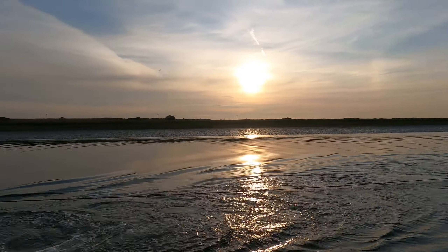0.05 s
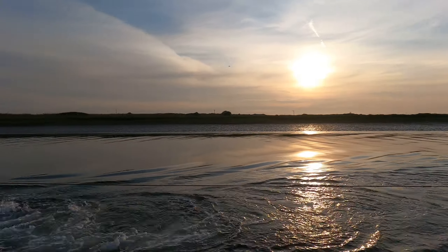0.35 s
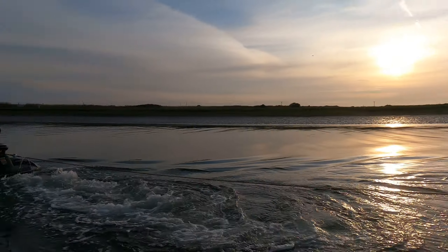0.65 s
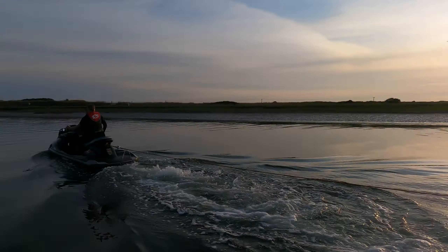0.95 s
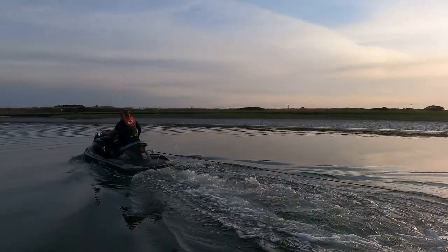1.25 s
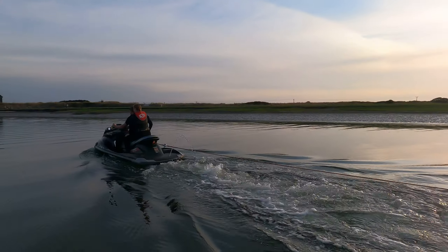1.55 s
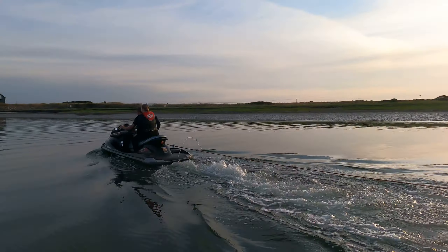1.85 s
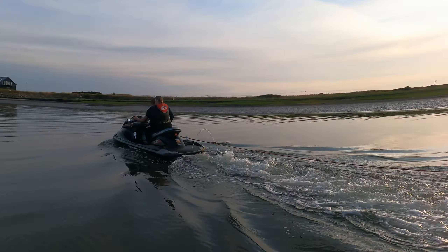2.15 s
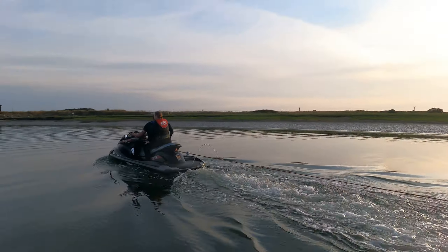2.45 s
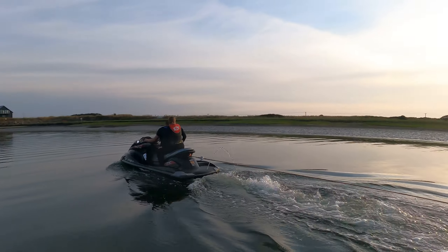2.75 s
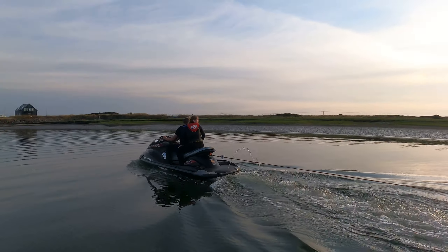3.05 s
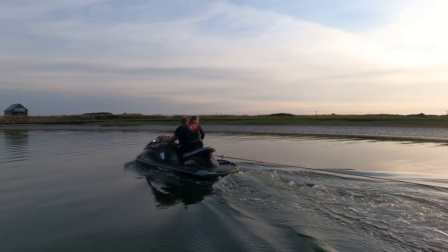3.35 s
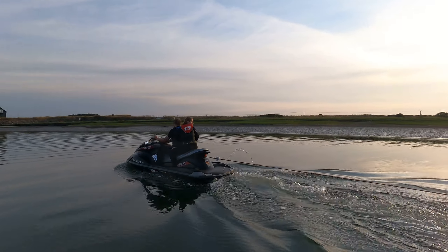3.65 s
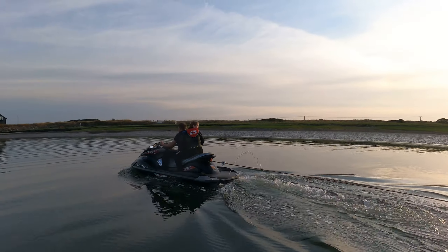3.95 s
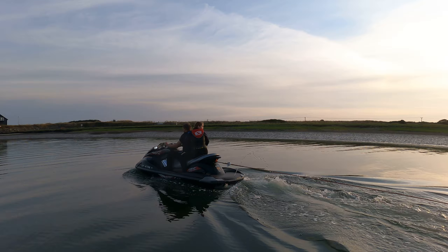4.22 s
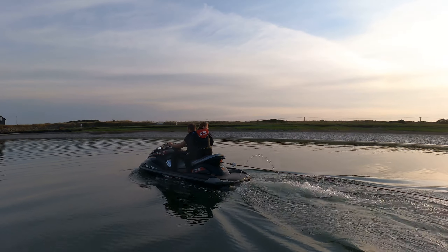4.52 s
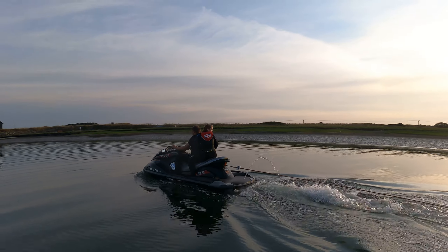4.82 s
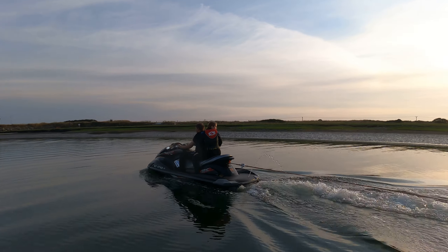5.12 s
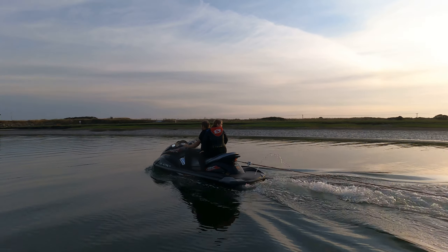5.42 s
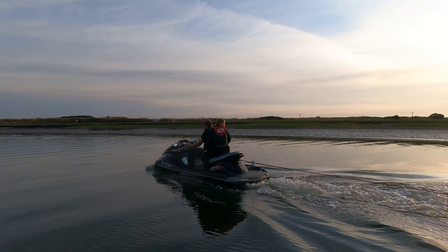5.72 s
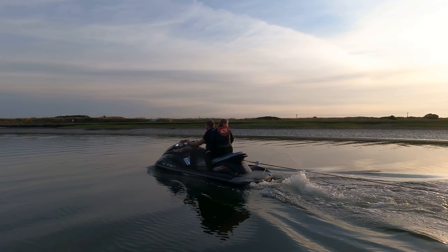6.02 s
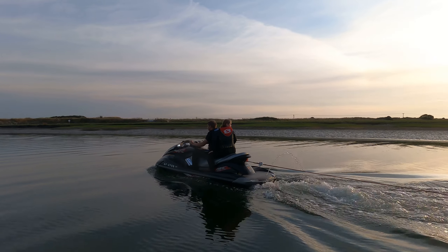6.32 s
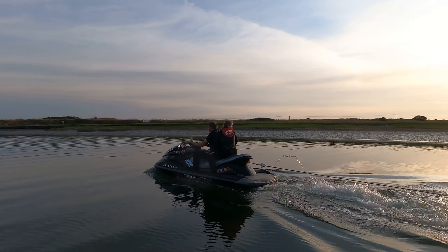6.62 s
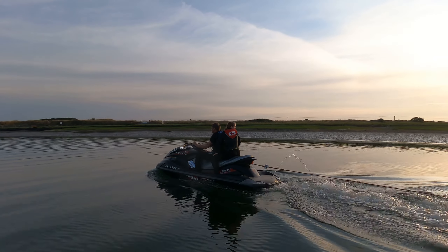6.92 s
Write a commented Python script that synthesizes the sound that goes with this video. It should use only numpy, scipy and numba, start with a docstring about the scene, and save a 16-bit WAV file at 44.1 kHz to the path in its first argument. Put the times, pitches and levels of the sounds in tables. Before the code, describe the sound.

A jet ski hums along near idle with a fizzing wake, while fingers rub and knock the microphone in the first seconds.

```python
"""Water scooter towing on calm water

A hand-held camera follows the craft at little more than idle. The engine's low note beats with a second
drone, loose machinery rings the hull, exhaust gas burbles through the water and bubbles fizz in the wake.
Drops fall and air buffets the microphone. For three seconds fingers rub and knock the camera housing;
its gain control ducks and slowly recovers."""
import sys
import numpy as np
from scipy import signal
from scipy.fft import rfft, irfft, next_fast_len
from scipy.io import wavfile
from scipy.ndimage import uniform_filter1d, minimum_filter1d, map_coordinates
from numba import njit

SR = 44100
rng = np.random.default_rng(int(sys.argv[2]) if len(sys.argv) > 2 else 0)


def store_pcm(level_fs):
    """Save levels as 16-bit WAV."""
    pcm = np.round(np.clip(level_fs, -1, 1) * 32767).astype(np.int16)
    wavfile.write(sys.argv[1], SR, np.atleast_2d(pcm).T)


N = 311787
T = np.arange(N) / SR
SIZE = next_fast_len(N + SR // 2, True)
FREQS = np.maximum(np.fft.rfftfreq(SIZE, 1 / SR), 1)

# The exhaust swells as the stern turns to the camera. Each row: time in seconds, gain in dB.
EXHAUST_SWELL = [(0, 1.5), (1.6, -1.5), (3.3, -1.5), (4.3, 0.2), (5.6, 0.5), (6.6, 1), (7.07, 1.5)]
# The machinery swells as the craft comes round in front. Each row: time in seconds, gain in dB.
MACHINERY_SWELL = [(0, 2), (.6, -1.5), (1.6, -1), (4.2, 0.5), (5.1, 2), (7.07, 2.5)]
# Transmission through the housing's thin wall. Each row: frequency in Hz, relative gain in dB.
WALL_SPECTRUM = [(250, -4.5), (600, 4), (850, 0), (1020, 13.5), (1400, 9), (1820, 16.5), (2060, -3.5),
                 (2300, 0), (2700, 6), (3050, 1), (3750, -9), (4150, -13.5), (4450, -7.5), (5350, -22.5),
                 (5800, -16), (6450, -44), (7300, -22.5), (8000, -28.5), (8600, -52.5), (10300, -51),
                 (14000, -60)]


def undb(db):
    """Amplitude ratio of a level in decibels."""
    return 10 ** (np.asarray(db) / 20)


def unit(x):
    """Normalisation to an rms of 1."""
    return x / np.sqrt(np.mean(x ** 2))


def curve(rows):
    """Linear interpolation of (time, value) rows."""
    return np.interp(T, *np.array(rows).T)


def over_hz(rows, column=1):
    """Interpolation of one column on a log-frequency axis."""
    rows = np.array(rows)
    return np.interp(np.log(FREQS), np.log(rows[:, 0]), rows[:, column])


def filtered(x, response):
    """Linear filtering: the spectrum is multiplied by a frequency response."""
    return irfft(rfft(x, SIZE) * response, SIZE)[..., :N]


def above(x, hz):
    """Steep high-pass filtering."""
    return filtered(x, 1 / (1 + (hz / FREQS) ** 8))


def resonance(hz, width_hz):
    """Response of a damped oscillator, gain 1 at its centre."""
    return 1 / (1 + 1j * (FREQS ** 2 - hz ** 2) / (FREQS * width_hz))


def walk(rate):
    """Smoothed random fluctuation with rate new values a second; rms 1."""
    hold = int(SR / rate)
    steps = np.repeat(rng.standard_normal(N // hold + 1), hold)
    return unit(uniform_filter1d(uniform_filter1d(steps, hold), hold)[:N])


def grains(rate, spread_db):
    """Shot noise: rate clicks a second, a few much larger than the rest."""
    size = undb(spread_db * np.minimum(rng.exponential(size=N), 5))
    return unit((rng.random(N) < rate / SR) * size * rng.choice([-1, 1], N))


def flurry(rate, spread_db, decay_s):
    """Envelope of random bursts that each decay exponentially; rms 1."""
    return unit(signal.lfilter([1], [1, -np.exp(-1 / (decay_s * SR))], np.abs(grains(rate, spread_db))))


def dying(start, decay_s):
    """Free decay: a sudden start and an exponential fall."""
    return (T >= start) * np.exp(-np.abs(T - start) / decay_s)


def stroke(start, length, edge=0.26):
    """Trapezoidal envelope of a contact that grows, holds and lets go."""
    progress = np.clip((T - start) / length, 0, 1)
    return np.minimum(np.minimum(progress, 1 - progress) / edge, 1)


def burst(x, length, db):
    """Scaling to the energy of a level db held for length seconds."""
    return unit(x) * undb(db) * np.sqrt(length * SR / N)


def struck(blows, gain):
    """Causality: a minimum-phase body rings only after each blow (time in seconds, peak in dB)."""
    cepstrum = irfft(np.log(gain + 1e-6 * gain.max()), SIZE)
    response = np.exp(rfft(2 * cepstrum * (np.arange(SIZE) < SIZE // 2)))
    force = np.zeros(N)
    for start, db in blows:
        force[int(start * SR)] += undb(db)
    return filtered(force, response / np.abs(irfft(response, SIZE)).max())


def harmonics(turns, orders, waver_db):
    """Periodic motion sounds at multiples of its rate; each wavers in level."""
    return sum(undb(db + waver_db * walk(6.5)) * np.sqrt(2) * np.sin(2 * np.pi * (k * turns + rng.random()))
               for k, db in orders)


def hum(turns, drone_hz=68.1):
    """Beating: the shaft's second harmonic interferes with a slightly lower drone."""
    # Each row of both: multiple of the source's rate, level in dB before the swell.
    engine_orders = [(2, -41), (3, -48), (4, -51), (6, -56.5), (8, -50.5), (11, -58)]
    drone_orders = [(1, -45), (3, -55.5)]
    drone_turns = np.cumsum(drone_hz * (1 + 0.0052 * walk(3.3))) / SR
    engine = harmonics(turns, engine_orders, waver_db=2.16)
    drone = harmonics(drone_turns, drone_orders, waver_db=2.1)
    return (engine + drone) * undb(curve(EXHAUST_SWELL))


def hull():
    """Gain of engine and hull, whose modes add in power."""
    # Each row: frequency in Hz, nominal width in Hz, gain in dB.
    modes = [(932, 67, -7.5), (1236.6, 111, 6), (1498, 68, -7), (1600, 47, -4.5), (1826, 44, -12.5),
             (1982, 80, -11), (2304, 380, -18), (2706, 150, -17), (2905, 110, -14.5), (4380, 130, -24.5),
             (5200, 200, -25.5)]
    return np.sqrt(sum(np.abs(undb(db) * resonance(hz, 1.06 * width) ** 2) ** 2 for hz, width, db in modes))


def clatter(turns, level_db=-42.5, firing_share=0.06, steady=4.2):
    """Forced vibration: a dense rattle drives the hull, a little harder at each firing, two a turn."""
    firing = 1 + firing_share * np.cos(4 * np.pi * turns)
    rattle = (steady + flurry(rate=500, spread_db=1.5, decay_s=0.0022)) * firing
    force = unit(rattle) * undb(level_db + curve(MACHINERY_SWELL))
    return filtered(force * rng.standard_normal((2, N)), unit(hull()))


def light_metal():
    """Gain of the light metal parts, which resonate in one bright band."""
    return np.abs(resonance(2801, 415)) ** 3


def chatter(level_db=-55.5, steady=1.6):
    """Random excitation in short clusters makes the light metal buzz."""
    force = unit(steady + flurry(rate=90, spread_db=0.1, decay_s=0.0065))
    buzz = unit(filtered(force * rng.standard_normal((2, N)), light_metal()))
    return buzz * undb(level_db + curve(MACHINERY_SWELL))


def burble(turns, level_db=-42, throb=0.34, gulp_db=2.0):
    """Modulated flow noise: the firings push exhaust gas through the water in gulps."""
    # Each row: frequency in Hz, relative spectral density in dB.
    spectrum = [(45, -18.5), (85, -7), (125, 1.5), (175, -3), (210, 4), (260, -6.5), (340, -11),
                (600, -12.5), (760, -22), (1100, -10.5), (2000, -68.5)]
    flow = (1 + throb * np.cos(4 * np.pi * turns)) * undb(gulp_db * walk(25))
    gas = filtered(flow * rng.standard_normal((2, N)), undb(over_hz(spectrum)))
    return unit(gas) * undb(level_db + curve(EXHAUST_SWELL))


def wake(level_db=-49, flutter_db=1.3, rush=0.82):
    """Tiny bursting bubbles add shot noise to the rush of churned water."""
    # Each row: frequency in Hz, relative spectral density in dB.
    spectrum = [(200, -7), (500, 8), (1000, 12.5), (1700, 18), (2100, 9), (2750, 9.5), (3100, -3.5),
                (3500, 2), (4500, 1.5), (4900, -11), (5600, -1.5), (5950, -12.5), (7400, -14),
                (9300, -23.5), (11000, -47), (14000, -63)]
    # The hiss fades over the first seconds, then swells back near five seconds.
    # Each row: time in seconds, gain in dB.
    swell = [(0, 4), (2.6, -0.5), (3.8, 0.7), (4.8, 4), (7.07, 1)]
    foam = np.zeros((2, N))
    for channel in foam:
        channel += grains(rate=2500, spread_db=2.0) + rush * rng.standard_normal(N)
        channel *= undb(flutter_db * walk(18))
    return unit(filtered(foam, undb(over_hz(spectrum)))) * undb(level_db + curve(swell))


def churn(patter=0.24, surge_db=-0.5):
    """Close water folds over in splashes, each a puff of shot noise from bursting bubbles."""
    # Each row: frequency in Hz, relative spectral density in dB.
    spectrum = [(400, -19.5), (900, 10.5), (1600, 10), (2150, -4), (2700, 0.5), (3350, 2.5), (4000, -9.5),
                (4600, -3.5), (5400, -11), (7000, -16.5), (9000, -26.5), (11000, -40), (14000, -46)]
    # Loudest as the camera swings past the wake. Each row: time in seconds, level in dB.
    levels = [(0, -41), (.65, -41.5), (1, -45), (2.5, -45.5), (3.5, -59), (4.7, -50.5), (5.8, -51.5),
              (7.07, -45.5)]
    splashes = patter * flurry(rate=110, spread_db=2.0, decay_s=0.0069) + undb(surge_db * walk(8.4)) / 2
    bubbles = np.array([grains(rate=6000, spread_db=2.5) for _ in range(2)])
    return unit(filtered(splashes * bubbles, undb(over_hz(spectrum)))) * undb(curve(levels))


def breeze(gust_db=1.5, side_db=-26):
    """Turbulent pressure: slow eddies press on both microphone ports almost alike."""
    # Each row: frequency in Hz, relative spectral density in dB.
    spectrum = [(4, -28.5), (11, 7), (26, 7.5), (45, -1), (90, -13.5), (200, -30), (600, -88.5)]
    # Strongest as the camera swings round. Each row: time in seconds, level in dB.
    levels = [(0, -49), (.35, -30.5), (1.4, -33), (2, -27.5), (2.65, -27), (3.4, -43), (7.07, -43)]
    mid, side = unit(filtered(rng.standard_normal((2, N)), undb(over_hz(spectrum))))
    strength = undb(curve(levels) + gust_db * walk(5.2))
    # stronger air breaks into smaller eddies, which differ between the ports
    side = side * undb(side_db) * strength / strength.max()
    return np.array([mid + side, mid - side]) * strength


def droplets(per_s=6.5, level_db=-43.5, centre_hz=4020, db_per_octave=-10, attack_s=.0003, decay_s=0.0017):
    """Stray droplets ping as damped sinusoids at random times, pitches and sides."""
    out, size = np.zeros((2, N)), 1024
    t = np.arange(size) / SR
    for when, pitch, strength, pan in rng.random((int(per_s * N / SR), 4)):
        start, octave = int(when * (N - size)), .9 * (2 * pitch - 1)
        envelope = (1 - np.exp(-t / attack_s)) * np.exp(-t / decay_s)
        ping = envelope * np.sin(2 * np.pi * centre_hz * 2 ** octave * t)
        gain = undb(level_db + db_per_octave * octave + 3 * (2 * strength - 0.5))
        out[:, start:start + size] += np.sqrt([[2 * pan], [2 - 2 * pan]]) * ping * gain
    return out


def ticks():
    """The clearest drops and slaps are transients: decaying noise in one band."""
    # Each row: start in seconds, peak in dB, centre in Hz, nominal width as a share of the centre,
    # decay in seconds, left minus right in dB.
    drops = [(0.086, -19.5, 2700, 0.67, 0.0012, 0), (0.1831, -30, 1990, .6, 0.0034, -5),
             (0.2996, -31.5, 3040, 0.42, 0.0039, -1.5), (0.59, -30, 2870, 0.44, 0.0069, 4),
             (0.611, -31, 2840, .45, 0.0022, -2), (0.6246, -48, 9500, .5, 0.0011, 16),
             (0.8265, -33, 2800, 0.64, 0.0021, -1), (1.023, -47, 6000, 0.76, 0.0011, 3),
             (1.298, -44, 4200, .8, 0.014, 5), (1.647, -34, 5200, 0.35, 0.0022, 4),
             (3.982, -59, 8200, 0.49, .0015, 3), (4.013, -37.5, 3850, 0.66, 0.0079, -2),
             (4.512, -33, 1960, 0.45, 0.0065, 0), (5.939, -60, 9200, 0.42, 0.0016, 10),
             (6.232, -57, 7950, .53, .0015, 11)]
    out = np.zeros((2, N))
    for start, db, hz, width, decay_s, pan_db in drops:
        tick = filtered(rng.standard_normal(N) * dying(start, decay_s), resonance(hz, width * hz) ** 3)
        out += undb(db + np.array([[pan_db], [-pan_db]]) / 2) * tick / np.abs(tick).max()
    return out


def housing():
    """Response of the camera housing, a superposition of damped modes."""
    # Each row: frequency in Hz, width in Hz, gain in dB before the broad band-pass.
    modes = [(259, 70, 0.5), (371, 160, -10), (511.6, 42, 2.5), (635, 93, 3.5), (855, 33, 0.5),
             (1040, 49, -4.5)]
    return sum(undb(db) * resonance(hz, width) for hz, width, db in modes) * resonance(382, 690) ** 2


def rasp():
    """Fine friction grains, filtered by the housing's thin wall."""
    return unit(filtered(grains(rate=5800, spread_db=3.0), undb(over_hz(WALL_SPECTRUM))))


def pressed(x, bend=.03, catch_db=1.85):
    """Shifting finger pressure modulates a rub in frequency and amplitude."""
    place = np.cumsum(1 + bend * walk(30))
    return map_coordinates(x, [place], order=3, mode="mirror") * undb(catch_db * walk(90))


def rubs(boom, body, boom_db=4.5, rasp_db=-6.5, crisp_hz=2290):
    """Sliding friction: a dry fingertip rasps, a soft pad makes the mount boom."""
    # Each row: start and length in seconds, then housing level, dryness and crispness in dB.
    slides = [(0.311, 0.15, -39.5, 9, 2), (0.574, 0.085, -39.5, 4.5, -0.5), (0.666, 0.059, -32.5, 6, -21),
              (0.892, 0.062, -36, -0.5, -18), (0.948, 0.044, -35.5, 10, -2), (0.973, 0.07, -29.5, -0.5, 1),
              (1.02, 0.055, -32.5, 5, -5.5), (1.05, 0.12, -46.5, 5, -3), (1.699, 0.058, -28, 5, 0),
              (1.741, 0.077, -35.5, 0.5, 0.5), (1.896, 0.105, -36, -3.5, 13), (1.985, 0.078, -37.5, 4.5, 4),
              (2.116, 0.067, -40, -3, 6), (2.166, 0.046, -35, -9, 2.5), (2.206, 0.055, -30, 2, -1.5),
              (2.355, 0.049, -27, -3.5, 4), (2.377, 0.094, -25, 1.5, 8), (2.469, 0.032, -33, -15, 5),
              (2.496, 0.14, -47, 2.5, 4)]
    shifting_grip = (0, 2.84, -52, 0.014, 0.0015)
    scrape = pressed(rasp())
    treble = above(scrape, crisp_hz)
    out = np.zeros(N)
    for start, length, db, dry_db, crisp_db in [shifting_grip] + slides:
        touch = stroke(start, length)
        crisp_scrape = scrape + (undb(crisp_db) - 1) * treble
        out += burst(touch * boom, length, db + boom_db - dry_db)
        out += burst(touch * body, length, db)
        out += burst(touch * crisp_scrape, length, db + rasp_db + dry_db)
    return out


def creaks(body, mount_hz, jitter=0.0364, drag_db=3, drag_share=0.92):
    """Stick-slip friction: a train of slips drives mount and housing while the fingertip drags."""
    # Each row: start and length in seconds, first, middle and last slip rate in Hz,
    # mount and housing levels in dB, low-pass corner in Hz.
    grips = [(0.928, 0.07, 131.6, 130.2, 125, -34.5, -28.5, 168.6),
             (2.269, 0.0886, 146.3, 173.7, 157, -10.5, -17, 796),
             (2.396, 0.064, 143, 139.2, 138, -22.5, -17.5, 261)]
    out = np.zeros(N)
    for start, length, first_hz, middle_hz, last_hz, boom_db, body_db, corner_hz in grips:
        rate = np.interp(T, [start, start + length / 2, start + length], [first_hz, middle_hz, last_hz])
        rate *= 1 + jitter * walk(200)
        slips = np.diff(np.floor(np.cumsum(rate) / SR), prepend=0) * stroke(start, length, edge=0.11)
        low_pass = 1 / (1 + 1j * FREQS / corner_hz) ** 2
        out += burst(filtered(slips, resonance(mount_hz, 70) ** 2), length, boom_db)
        out += burst(filtered(slips * undb(5.0 * walk(150)), housing() * low_pass), length, body_db)
        drag = burst(stroke(start, drag_share * length) * body, length, body_db + drag_db)
        out += filtered(drag, np.sqrt(low_pass))
    return out


def handling(mount_hz=133):
    """Friction rings the housing and rocks it on its hand-damped mount, in rubs and creaks."""
    friction = grains(rate=1800, spread_db=1)
    boom = filtered(friction, resonance(mount_hz, 28) * resonance(mount_hz, 66))
    body = pressed(filtered(friction, housing()))
    return rubs(boom, body) + creaks(body, mount_hz)


def knocks(ring_hz=142, thud_hz=58, thud_s=0.0082, contact_s=0.005, scrape_s=0.029):
    """Impact and free decay: a click and a thud, then mount and housing ring as the grip scrapes."""
    # The mount rings longer with the hand off it. Each row: start in seconds, ring in dB, its decay in
    # seconds, thud in dB, housing in dB, its decay in seconds, scrape in dB, click in dB.
    blows = [(0.359, -18.5, 0.058, -23, -38, 0.027, -54, -39),
             (0.683, -37, 0.01, -24, -30.5, 0.034, -43, -19.5),
             (0.919, -24, 0.0069, -10.5, -36, .01, -45, -34),
             (0.939, -22.5, 0.011, -21, -18, 0.016, -31, -20),
             (0.994, -13, 0.018, -9, -35, 0.0091, -38.5, -20),
             (1.811, -14.5, 0.053, 2, -24, .02, -31.5, -21), (2.234, -37, 0.013, -2.5, -32, .02, -42, -22),
             (2.253, -2.5, 0.012, -21.5, -15, 0.015, -28.5, -12.5),
             (2.482, -1, 0.018, -1.5, -5.5, 0.0075, -36, -21.5),
             (2.512, -11.5, 0.011, 2, -32, 0.024, -37.5, -30.5),
             (2.634, -15, 0.025, -15, -33, 0.023, -36.5, -28.5),
             (2.666, 1, 0.048, 5.5, -15.5, 0.031, -16, -11)]
    out, scrape = np.zeros(N), rasp()
    body = unit(filtered(rng.standard_normal(N), housing()))
    for start, ring_db, ring_s, thud_db, body_db, body_s, scrape_db, _ in blows:
        ring = undb(ring_db) * dying(start, ring_s) * np.sin(2 * np.pi * ring_hz * (T - start))
        thud = undb(thud_db) * dying(start, thud_s) * np.sin(2 * np.pi * thud_hz * (T - start))
        shell = undb(body_db) * dying(start, body_s) * body
        grip = undb(scrape_db) * dying(start, scrape_s) * scrape
        out += (1 - dying(start, contact_s)) * (ring + thud + shell + grip)
    clicks = [(start, click_db) for start, *_, click_db in blows]
    return out + struck(clicks, undb(over_hz(WALL_SPECTRUM)))


def scratches(lowest_hz=4970):
    """A skidding fingernail excites only the highest modes of the wall."""
    # Each row: start in seconds, length in seconds, level in dB.
    skids = [(2.246, 0.026, -56), (2.402, 0.053, -56), (2.662, 0.012, -46.5), (2.678, 0.028, -43.5)]
    thin = above(rasp(), lowest_hz)
    return sum(burst(stroke(start, length) * thin, length, db) for start, length, db in skids)


def clanks(rebound_s=0.0042, rebound_db=-8.5):
    """Inelastic impact: a loose part rings hull and light metal, then lands again more weakly."""
    # Each row: start in seconds, peak of the hull in dB, peak of the light metal in dB.
    blows = [(3.358, -44, -37.5), (3.646, -45, -46), (3.8935, -36, -41), (4.0112, -29, -47),
             (4.2644, -32, -43), (4.361, -37, -35), (4.511, -26.5, -33), (4.679, -30, -44),
             (5.0188, -36, -37), (5.112, -28, -35), (5.1994, -28.5, -44), (5.648, -43, -40),
             (6.058, -25.5, -42), (6.157, -27.5, -44), (6.232, -42, -35), (6.5495, -43, -38),
             (6.715, -26.5, -42), (6.915, -33, -40)]
    starts, hull_db, metal_db = np.array(blows).T
    rebounds = starts + rebound_s * (.5 + rng.random(len(starts)))
    times = np.r_[starts, rebounds]
    return sum(struck(zip(times, np.r_[db, db + rebound_db]), gain)
               for db, gain in [(hull_db, hull()), (metal_db, light_metal())])


def outdoors(pair, field):
    """Partial coherence: two unrelated versions of a sound become mid and side."""
    mid, side = pair[0], filtered(pair[1], undb(over_hz(field)))
    lean = undb(over_hz(field, column=2) / 2)
    return filtered(np.array([mid + side, mid - side]), np.array([lean, 1 / lean]) * 2 / (lean + 1 / lean))


def through_housing(x):
    """Structure-borne sound reaches each port with its own phase and strength."""
    # Each row: frequency in Hz, phase lead of the left in radians, left minus right in dB.
    ports = [(80, 0.1, 0.3), (170, 0.11, 0), (254, 0.85, -4.5), (400, 1.36, 0.5), (547, 1.13, -3),
             (780, 2, -10), (930, 2, -10), (890, 0.83, 2), (1280, 1.65, 2), (1880, 0.3, 2.5),
             (2380, 2, -0.5), (2660, 0.6, 13.5), (5100, -1.5, -3.5), (7000, 13, 3), (11000, -3, 22)]
    lean = undb(over_hz(ports, column=2) / 2)
    left = lean * np.exp(.5j * over_hz(ports))
    return filtered(x, np.array([left, 1 / left]) * 2 / (lean + 1 / lean))


def narrowed(pair):
    """The stereo image closes and reopens as the side signal fades and returns."""
    # Each row: time in seconds, side gain in dB.
    width = [(0, -1.5), (2.75, -1), (3.1, -9), (3.3, -16), (3.55, -32), (3.95, -50), (4.3, -15.5),
             (4.55, -10), (5.1, -4), (5.6, -1.5), (7.07, -1)]
    mid = (pair[0] + pair[1]) / 2
    side = (pair[0] - pair[1]) / 2 * undb(curve(width))
    return np.array([mid + side, mid - side])


def scene(shaft_hz=36.64, wander=0.00698, jitter_turns=.012):
    """Superposition of craft and water around the camera, handling and breeze right on it."""
    # Stereo spread. Each row of both: frequency in Hz, side minus mid in dB, left minus right in dB.
    craft_field = [(120, -56, 0), (300, -31, 0.4), (650, -8, 5), (900, -41.5, 1), (1250, -33.5, 3),
                   (1750, -38, 2), (2200, -22, 1), (2800, -29, 4.5), (3200, -29, 5), (5000, -31.5, -0.5),
                   (9100, -10.5, 1), (12300, 4, 18.5)]
    water_field = [(300, -14, -8), (655, 9.5, -8), (950, -12.5, 4), (1500, -11.5, 17), (2040, 11, -3),
                   (2870, 7, 1.5), (3400, -2, -1.5), (5000, -0.5, -5), (9000, -6, 13), (12000, -5, 9.5)]
    turns = np.cumsum(shaft_hz * (1 + wander * walk(5))) / SR
    turns += jitter_turns * walk(25)  # uneven firings push the shaft ahead and behind
    tones = hum(turns)
    craft = outdoors(clatter(turns) + chatter() + burble(turns) + wake(), craft_field) + clanks()
    water = outdoors(churn(), water_field) + ticks()
    fingers = through_housing(handling() + knocks() + scratches())
    return narrowed(tones + craft + water + fingers + breeze() + droplets())


@njit
def peak_follower(x, hold, fall):
    """Peak detection: jumps to each peak, holds it, then sinks exponentially."""
    out, peak, age = np.empty(len(x)), 0., 0.
    for i in range(len(x)):
        age += 1
        if x[i] > peak:
            peak, age = x[i], 0.
        elif age > hold:
            peak *= fall
        out[i] = peak
    return out


def record(dry, ceiling_db=-5.0, hold_s=0.37, recover_db_per_s=14.0, top_hz=13500):
    """Automatic gain control ducks at once under a peak and recovers slowly; a low-pass cuts the top."""
    peak = peak_follower(np.abs(dry.mean(axis=0)), float(hold_s * SR), float(undb(-recover_db_per_s / SR)))
    gain = np.minimum(undb(ceiling_db) / (peak + 1e-9), 1)
    gain = uniform_filter1d(minimum_filter1d(gain, size=129), size=129)
    return signal.sosfilt(signal.ellip(8, .2, 70, top_hz, fs=SR, output="sos"), dry * gain)


dry = scene()
out = record(dry)
store_pcm(out)
```